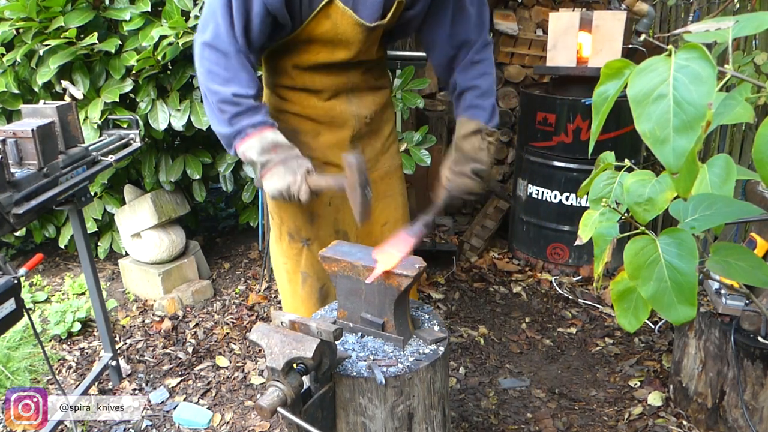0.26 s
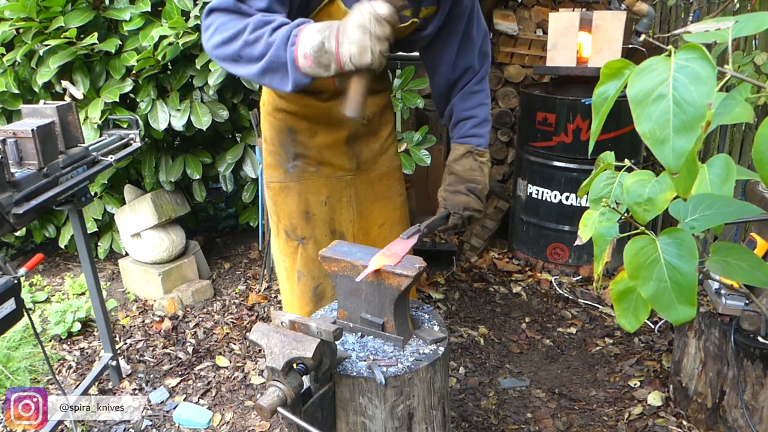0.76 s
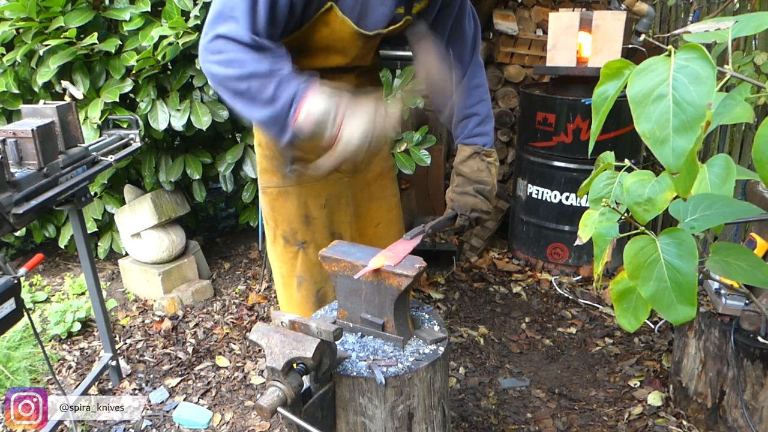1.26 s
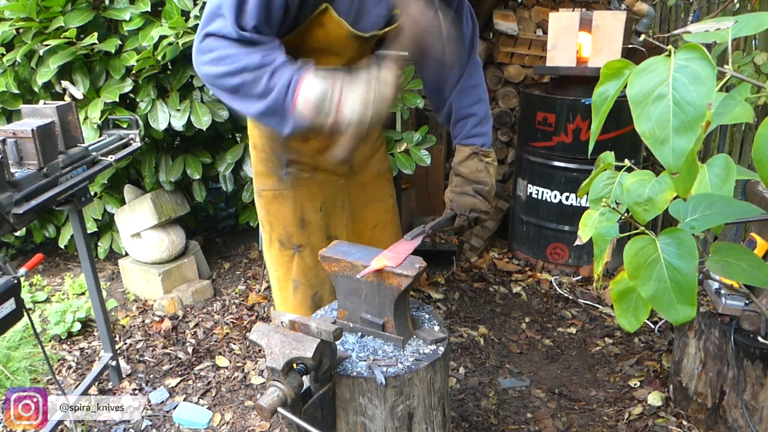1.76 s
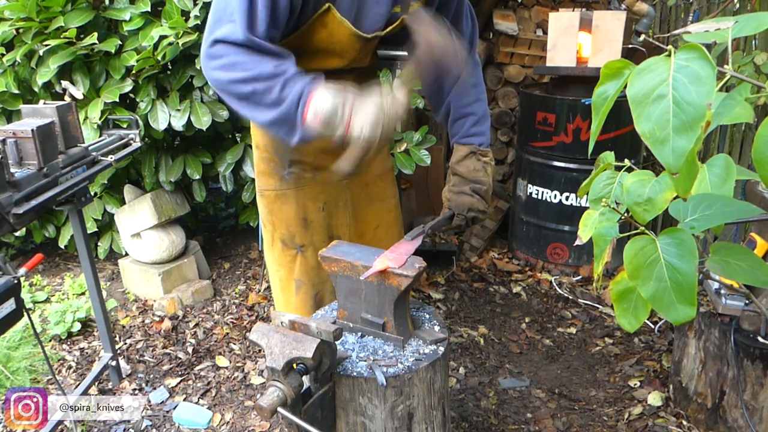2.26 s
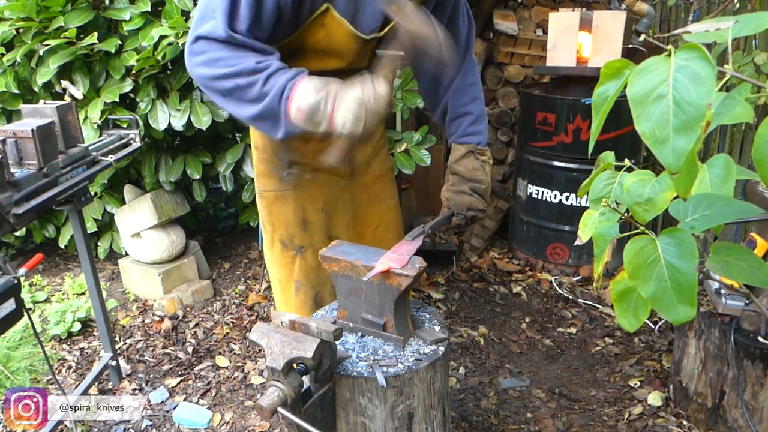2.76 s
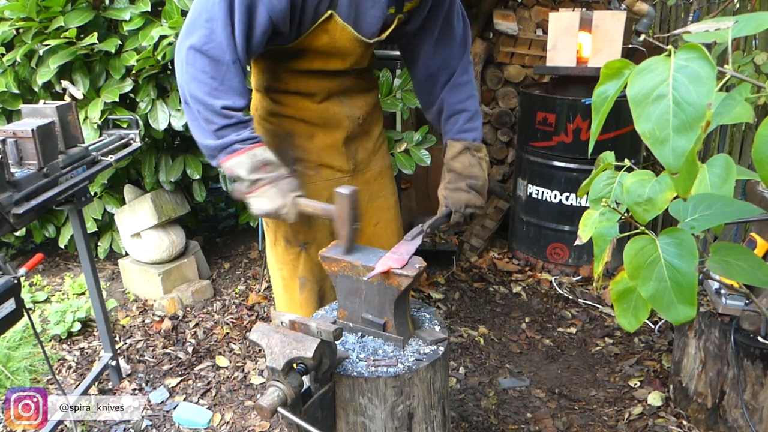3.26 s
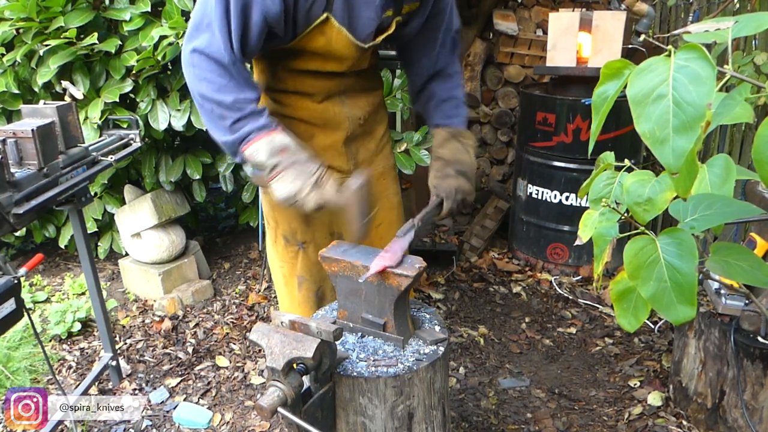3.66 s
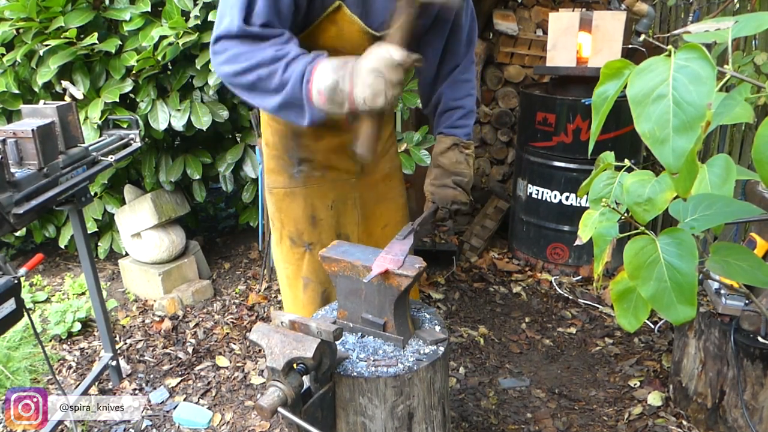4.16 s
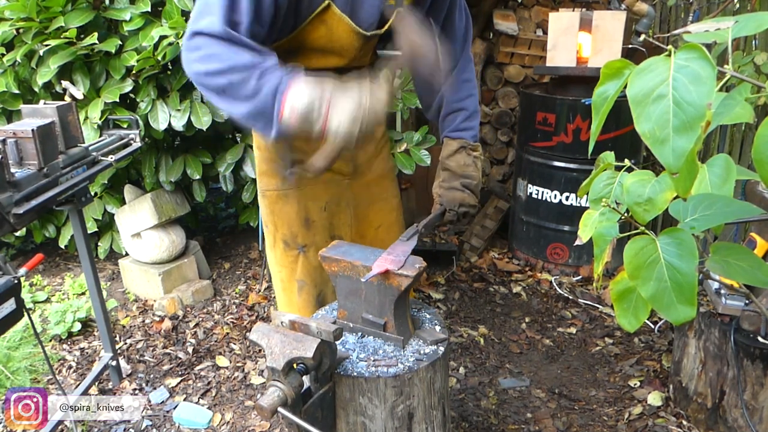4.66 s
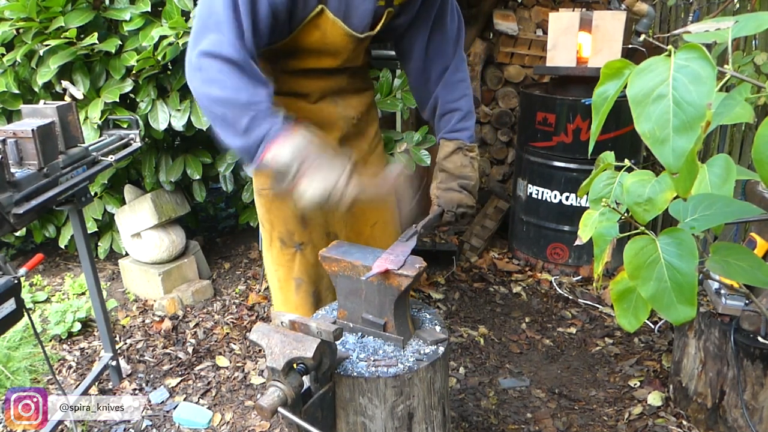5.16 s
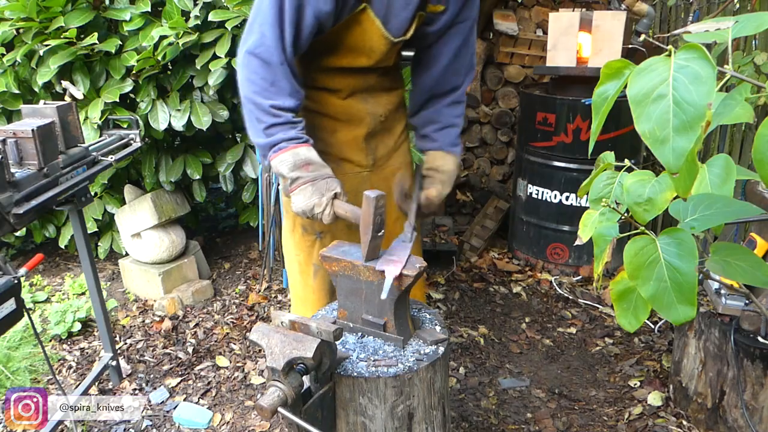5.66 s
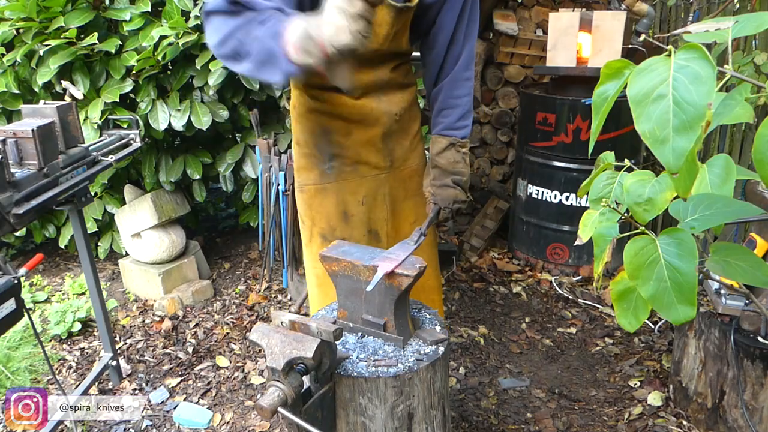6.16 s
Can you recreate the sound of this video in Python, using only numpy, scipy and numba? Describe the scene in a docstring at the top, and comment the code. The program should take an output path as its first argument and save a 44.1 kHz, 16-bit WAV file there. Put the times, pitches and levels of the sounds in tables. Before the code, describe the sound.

Rapid, hard metallic hammer blows with short high rings, over a low gas-burner roar that swells whenever the hammering pauses.

```python
"""A hammer strikes a hot blade on a small anvil in a garden, in front of a gas forge that roars.
Each blow clacks through damped modes, is heard twice about 12 ms apart, and leaves a few high steel modes ringing.
The roar and hiss are coloured noises with wavering levels; soft metallic puffs and a double tink fill in.
The camera's gain control ducks on sharp peaks, so the roar swells in the pauses."""
import sys
import numpy as np
from scipy.fft import rfft, irfft, next_fast_len
from scipy.io import wavfile
from scipy.ndimage import uniform_filter1d, map_coordinates
from numba import njit

SR = 44100
rng = np.random.default_rng(int(sys.argv[2]) if len(sys.argv) > 2 else 0)


def master(y):
    """Save y as 16-bit WAV."""
    cut = np.clip(np.atleast_2d(y).T, -1, 1)
    pcm = np.round(cut * 32767)  # scale
    wavfile.write(sys.argv[1], SR, pcm.astype(np.int16))


N = 282681
LEAD = SR // 5  # samples of room for a blow placed just before the start
DOUBLE_S = 0.0121  # each blow or tink is heard twice, this far apart


def amp(db):
    """Decibels to an amplitude factor."""
    return 10 ** (np.asarray(db) / 20)


def unit(x):
    """Scale to rms 1."""
    return x / np.sqrt(np.mean(x ** 2) + 1e-20)


def along(points, hz):
    """Read a curve of (pitch_hz, value) points on a log frequency axis."""
    f, v = np.transpose(points)
    return np.interp(np.log(hz + 1), np.log(f + 1), v)


def wobble(rate, size=N):
    """A smooth random curve with rate knots a second."""
    knots = rng.standard_normal(int(size * rate / SR) + 4)
    return map_coordinates(knots, [np.arange(size) * rate / SR])


def filtered(x, response):
    """Shape x by a complex response of frequency."""
    n = x.shape[-1]
    m = next_fast_len(n + SR // 4)
    return irfft(rfft(x, m) * response(np.fft.rfftfreq(m, 1 / SR)), m)[..., :n]


def sides(balance, hz):
    """Left and right gains for a left-minus-right balance curve in dB."""
    return amp(np.outer([.5, -.5], along(balance, hz)))


def pair(spectrum, alike, size=N):
    """Left and right noises of one colour, rms 1, partly alike through a shared middle."""
    def middle_and_side(hz):
        angle = np.arccos(np.clip(along(alike, hz), -1, 1)) / 2
        return amp(along(spectrum, hz)) * [np.cos(angle), np.sin(angle)]

    mid, side = filtered(rng.standard_normal((2, size)), middle_and_side)
    return unit(np.array([mid + side, mid - side]))


def resonance(hz, centre, width):
    """Complex response of one damped mode, 1 at its centre."""
    return 1j * hz * width / (centre * centre - hz * hz + 1j * hz * width)


def ringing(hz, db, t60, rise, t):
    """A steel mode: a sine with a soft start and an exponential decay."""
    t = np.clip(t, 0, None)
    soft_start = 1 - np.exp(-(t / rise) ** 2)
    return soft_start * amp(db - 60 * t / t60) * np.sin(2 * np.pi * (hz * t + rng.random()))


def empty_track():
    """A silent stereo track with room before the start and after the end."""
    return np.zeros((2, LEAD + N + SR))


def place(track, start_s, sound):
    """Add a sound to the track at its start time."""
    start = LEAD + round(start_s * SR)
    track[:, start:start + sound.shape[-1]] += sound


# anvil heard left against right: pitch_hz, left_minus_right_db
ANVIL_SIDE = [(300, -5.5), (1300, -5.5), (1700, -6.5), (3000, -3.5), (8000, 0), (15000, 3.5)]


def anvil_at_microphone(track):
    """Stereo placing, and no deep bass from so small an anvil."""
    return filtered(track, lambda hz: sides(ANVIL_SIDE, hz) * (1j * hz / (60 + 1j * hz)) ** 2)


# damped modes of blade and anvil, before each clack's offsets: pitch_hz, width_hz, level_db
# rows: thud, main, two of the upper body, then treble
BODY_MODES = [(985, 250, 2), (1624, 234, 11), (3186, 380, 5.5), (3996, 1200, -9.5), (4970, 1050, -10.5),
              (6480, 270, -13.5), (8410, 100, -5.5), (10250, 200, 0), (13600, 280, -1)]
# the log under the anvil, before the thud offset: pitch_hz, width_hz, level_db
STUMP = (360, 266, 6.3)
# near echoes within each knock: delay_s, level_db
GROUND_ECHOES = [(.0011, -19.5), (.0026, -38), (.0052, -21)]


def knock(upper_db, treble_db, thud_db, t):
    """A push and a noisy crunch excite the damped modes and the log, with near echoes."""
    push = 0.22 * amp(-60 * t / 0.017) * rng.standard_normal(len(t))
    push[:4] += np.hanning(6)[1:5]
    extra_db = [thud_db + 8.5, 0, upper_db + 5.0, upper_db + 0.5]
    extra_db += [treble_db + 2.5] * (len(BODY_MODES) - 4)
    log_hz, log_width, log_db = STUMP

    def response(hz):
        body = sum((-1) ** k * amp(db + extra_db[k]) * resonance(hz, centre, width)
                   for k, (centre, width, db) in enumerate(BODY_MODES))
        log = amp(log_db + thud_db) * resonance(hz, log_hz, log_width)
        echoes = 1 + sum(amp(db) * np.exp(-2j * np.pi * hz * s) for s, db in GROUND_ECHOES)
        return (body - log) * echoes

    sound = filtered(push, response)
    return sound / np.sqrt(np.mean(sound[:SR // 400] ** 2))  # first 2.5 ms at rms 1


# faint partials of a clack, in matching rows: pitch_hz
FAINT_HZ = [4775, 5850, 6280, 9426, 10910]
# level_db (re clack, before treble offset and random change), t60_s
FAINT = [(-35, 0.11), (-30, 0.078), (-31, 0.086), (-21, 0.079), (-23, 0.07)]
# colour of the first crack: pitch_hz, level_db_per_hz
CRACK = [(2500, -2), (4500, 0), (8000, -7.5), (12000, -15), (16000, -25)]
# colour of the scatter after the knock: pitch_hz, level_db_per_hz
SPLASH = [(410, -17), (700, -0.5), (5290, -7), (8510, -8), (8860, -2.5), (9590, -12), (10900, -8.5),
          (15200, -13.5), (16500, -54)]


def clack(scatter_db, upper_db=0, treble_db=0, thud_db=0):
    """One clack of level about 1: knock, first crack of noise, faint partials and scatter."""
    t = np.arange(SR // 5) / SR
    body = knock(upper_db, treble_db, thud_db, t)
    partials = sum(ringing(hz, db + treble_db + rng.normal(0, 6.8), t60, 0.0027, t)
                   for hz, (db, t60) in zip(FAINT_HZ, FAINT))
    crack_level = amp(-4.5 + treble_db - 60 * t / 0.013) * (1 - np.exp(-t / 0.00012))
    crack = crack_level * pair(CRACK, [(6000, 1.0)], size=len(t))
    # scatter fades in a quick and a slow stage
    fade = (amp(-60 * t / 0.021) + amp(-4.5 - 60 * t / 0.13)) * (1 - np.exp(-t / 0.0013))
    scatter = fade * pair(SPLASH, [(1000, 0.61), (6000, 0.78), (13000, 0.45)], size=len(t))
    return body + crack + partials + amp(scatter_db + 0.42 * treble_db) * scatter


# long-ringing steel modes, in matching rows: pitch_hz
RING_HZ = [8403, 9372, 10180, 10330, 7333, 7718]
# waits (1 = sounds only once the hammer has lifted)
RING_WAITS = [0, 1, 1, 0, 0, 0]
# group (which ring level of a blow the mode takes)
RING_GROUP = [0, 1, 2, 2, 3, 3]
# t60_s, rise_s, left_minus_right_db, level_db (re its group)
RING = [(0.48, 0.013, 2.5, 0), (0.17, 0.015, 3.6, 0), (0.11, 0.0013, 5.5, -1), (0.041, 0.0015, 0, 2.5),
        (0.12, 0.004, 8, 8), (0.12, 0.006, 9, 6)]
LIFT_S = 0.0054  # the hammer lifts this long after the louder sounding


def steel_ring(group_db, until_next_s):
    """High steel modes waver and decay, and fade out just before the next strong blow."""
    t = np.arange(SR) / SR
    fade_out = np.clip((until_next_s - 0.004 - t) / 0.0062, 0, 1) ** 2  # silent 4 ms before it
    ring = np.zeros((2, SR))
    for hz, waits, group, (t60, rise, pan_db, own_db) in zip(RING_HZ, RING_WAITS, RING_GROUP, RING):
        waver = amp(2.93 * wobble(28.0, size=SR))
        mode = ringing(hz, group_db[group] + own_db, t60, rise, t - waits * LIFT_S)
        ring += np.outer(amp([pan_db / 2, -pan_db / 2]), fade_out * waver * mode)
    return ring


# blows, and the clack under the double tink at 5.95 s, each heard twice:
# start_s (first sounding), first_level_db, second_level_db, treble_db, thud_db (offsets),
# then ring level_db of four groups: 8.4 kHz, 9.4 kHz, pair at 10 kHz, pair at 7.5 kHz
BLOWS = [(-0.08, -4.5, -28, -2, -5, -47, -20, -39, -48),
         (0.0828, -35.5, -17.5, -5, -13, -45.5, -31, -43, -55),
         (0.237, -26, -23, -2, -23, -36, -35, -25, -62), (0.9115, -26.5, -51, 9, -6, -36, -29, -49, -52),
         (1.0834, -28, -22, -1, -1, -32.5, -46, -29, -59),
         (1.2531, -18.5, -38.5, -2, -6, -35, -28, -47, -54),
         (1.404, -28.5, -19.5, 3, -5, -35, -16, -28, -56),
         (1.5711, -20, -32.5, 4.5, -4, -48, -25, -37, -51), (1.728, -26, -21, 4.5, -2, -42, -15, -32, -50),
         (1.8954, -37.5, -18.5, 1, -1.5, -32, -18, -38, -44),
         (2.0667, -18.5, -26, -2.5, -6, -38.5, -16, -32, -53),
         (2.2349, -19, -33, 3, -1.5, -37, -15, -41, -53), (2.3983, -20.5, -28, 4, -0.5, -43, -18, -44, -52),
         (2.5627, -21, -25, 1, -3, -41, -16, -37, -55),
         (2.7291, -20.5, -27.5, 4.5, 0.5, -42, -10, -42, -55),
         (2.894, -19, -24, -1.5, -0.5, -48, -19.5, -32, -43),
         (3.0586, -31, -19, 1.5, -5, -44, -21.5, -38, -50),
         (3.234, -30, -19, -1, 1.5, -45, -21.5, -44, -53),
         (3.9116, -42.5, -22.5, 3.5, 2, -56, -36, -49, -46), (4.1114, -20, -29, -2, -1, -33, -29, -48, -39),
         (4.2896, -19, -36, 4, 1.5, -28.5, -14, -42, -36),
         (4.4577, -21, -24, 4.5, -1.5, -34, -21.5, -46, -40),
         (4.6353, -18.5, -27.5, -2, 0, -37.5, -31, -29.5, -42),
         (4.8063, -35.5, -18.5, 1.5, -2.5, -33.5, -44, -45, -46),
         (4.9908, -21.5, -21.5, 0.5, -2.5, -34.5, -25, -31, -52),
         (5.163, -41, -18.5, -1.5, -9, -35.5, -23.5, -35, -55),
         (5.374, -18.5, -30.5, 1.5, -6, -37.5, -21.5, -34, -49),
         (5.4957, -50, -35, -32, -12, -52, -55, -57, -70),
         (5.9549, -36.5, -32.5, -5.5, 4.5, -54, -59, -44, -56),
         (6.3102, -26, -34.5, 10, 0, -26, -27, -44, -45)]
STRONG_DB = -33  # a blow whose louder sounding is no stronger than this leaves earlier rings sounding
UPPER_DB, UPPER_SCATTER_DB = -1.5, 1.2  # upper body offset, and its random change from row to row
UPPER_FOLLOWS = 0.18  # share of the treble offset that the upper body follows


def hammer():
    """Each clack is heard twice; the steel ring starts with its louder sounding."""
    clacks, rings = empty_track(), empty_track()
    louder_s = [s + DOUBLE_S * (second_db > first_db) for s, first_db, second_db, *_ in BLOWS]
    strong_s = [s for s, row in zip(louder_s, BLOWS) if max(row[1:3]) > STRONG_DB]
    strong_s.append(N / SR + 1)
    for row, ring_s in zip(BLOWS, louder_s):
        first_s, first_db, second_db, treble_db, thud_db, *group_db = row
        upper_db = rng.normal(UPPER_DB + UPPER_FOLLOWS * treble_db, UPPER_SCATTER_DB)
        hit = clack(-5.5, upper_db, treble_db, thud_db)
        place(clacks, first_s, amp(first_db) * hit)
        place(clacks, first_s + DOUBLE_S, amp(second_db) * hit)
        next_s = min(s for s in strong_s if s > ring_s)
        place(rings, ring_s, steel_ring(group_db, next_s - ring_s))
    return anvil_at_microphone(clacks) + rings


# burner strength: start_s, flame_db, jet_db
FLAME = [(0, 0.5, -0.5), (.4, -3, -2.5), (.8, -0.5, -0.5), (1.3, 1.5, 1), (2.1, 0, 1.5), (3, -1.5, -1),
         (3.5, -0.5, -1), (4.2, 1.5, 4.5), (4.9, -1, -0.5), (5.6, 0.55, 1), (6.2, 1.5, 2), (6.41, 1, 6.5)]
# flame in the chamber: pitch_hz, level_db_per_hz
ROAR = [(15, -88), (25, -63), (104, -21), (141, -22), (209, -11.5), (248, -10.5), (338, 0.5), (388, -8.5),
        (468, -7.5), (555, -21), (659, -15), (782, -28.5), (928, -27.5), (1120, -30.5), (1500, -49.5),
        (1950, -94), (3300, -120)]
# gas jet: pitch_hz, level_db_per_hz
HISS = [(760, -4), (1300, -2), (1540, -7), (1890, -2.5), (2430, -6), (3420, -8), (3840, -7.5), (4650, -11),
        (6400, -11), (7510, -19), (8710, -15), (10600, -16.5), (12600, -19), (15600, -23), (16500, -36)]
# likeness of the two channels: pitch_hz, likeness (1 = identical)
ALIKE = [(40, 0.25), (130, 0.79), (300, 0.96), (550, 0.92), (1200, 0.88), (3000, .8), (8000, 0.84),
         (15000, .6)]
# burner resonances: pitch_hz, width_hz, lift_db
PIPE = [(1080, 80, 3), (1220, 80, 3), (1870, 130, 6), (3870, 260, 4), (12500, 1100, 4)]
# forge heard left against right: pitch_hz, left_minus_right_db
FORGE_SIDE = [(60, 1), (110, 3), (200, -1.5), (380, -3.5), (700, -6.5), (1290, -8.5), (2380, -6.5),
              (4400, -2.5), (8120, -0.5), (15000, 2.5)]
# phase between the channels: pitch_hz, left_lead_rad
FORGE_LEAD = [(130, -1.44), (350, -0.81), (700, -0.68), (1100, -0.47), (3000, -0.26), (12000, 0.51)]


def forge():
    """Turbulent flame booms in the chamber's resonances over the hiss of the jet."""
    knot_s, *levels = np.transpose(FLAME)
    flame_db, jet_db = [np.interp(np.arange(N) / SR, knot_s, v) for v in levels]
    roar_db = -34.5 + flame_db + 0.63 * wobble(9) + 1.29 * wobble(45)
    hiss_db = -59.5 + jet_db + 0.84 * wobble(6.2) + 1.1 * wobble(55)
    roar = amp(roar_db) * pair(ROAR, ALIKE)
    hiss = amp(hiss_db) * pair(HISS, ALIKE)

    def response(hz):
        lift = amp(sum(db / (1 + (2 * (hz - c) / w) ** 2) for c, w, db in PIPE))
        lead = np.exp(1j * np.outer([.5, -.5], along(FORGE_LEAD, hz)))
        return lift * sides(FORGE_SIDE, hz) * lead

    return filtered(roar + hiss, response)


# colour of a puff, before its treble offset: pitch_hz, level_db_per_hz
PUFF_COLOUR = [(700, -22), (1800, -5), (3500, 2.5), (7000, -4.5), (10500, -4), (15000, -20)]


def puff(treble_db):
    """A soft, short metallic puff: coloured noise with a gentle onset."""
    t = np.arange(SR // 20) / SR
    colour = [(hz, db + treble_db * (hz > 2500)) for hz, db in PUFF_COLOUR]
    envelope = (1 - np.exp(-t / 0.0025)) * amp(-60 * t / 0.039)
    return envelope * pair(colour, [(3000, 0.86)], size=len(t))


# soft metallic puffs, some of them faint lead-ins just before a blow:
# start_s, level_db, treble_db (offset)
PUFFS = [(0.459, -38, -1), (0.47, -40.5, -6), (0.901, -38.5, 4), (1.24, -32.5, -7), (3.3, -45, -25),
         (3.312, -37.5, -27), (3.331, -46, -25), (5.505, -39, -21), (5.667, -46, -5), (5.772, -45, 0)]


def metallic_puffs():
    """Soft short puffs of noise, placed left to right like the anvil."""
    track = empty_track()
    for start_s, db, treble_db in PUFFS:
        place(track, start_s, amp(db) * puff(treble_db))
    return anvil_at_microphone(track)


# blade knocked against the tongs: pitch_hz, level_db, t60_s
TINK = [(1057, -29.5, 0.05), (2297, -28.5, 0.035), (2376, -31, 0.072), (2950, -41, 0.049),
        (3520, -29, 0.015), (4000, -34, 0.028), (4830, -45, 0.069)]
TINK_S = 5.953


def tongs_tink():
    """The blade knocks against the tongs: short steel modes, heard twice."""
    track = empty_track()
    t = np.arange(SR) / SR
    for start_s in (TINK_S, TINK_S + DOUBLE_S):
        place(track, start_s, sum(ringing(hz, db, t60, 0.0013, t) for hz, db, t60 in TINK))
    return anvil_at_microphone(track)


def scene():
    """Hammer, puffs and tink in front, forge behind."""
    front = hammer() + metallic_puffs() + tongs_tink()
    return front[:, LEAD:LEAD + N] + forge()


@njit
def held(excess, fall):
    """Peak follower: jumps up at once, sinks exponentially."""
    out, level = np.empty_like(excess), excess[0]
    for i in range(len(excess)):
        level = max(excess[i], level * fall)
        out[i] = level
    return out


TOP_HZ = 16600  # band limit


def record(dry):
    """Gain control ducks late and lets go in a quick and a slow stage; then peak rounding and treble limit."""
    edge = filtered(dry.mean(0), lambda hz: hz / (hz + 1500) * (hz > 900))  # it listens to the treble
    loud_db = 10 * np.log10(np.abs(uniform_filter1d(edge ** 2, SR // 500)) + 1e-12)
    excess = np.clip((loud_db + 39) / 16, 0, 1)
    excess[0] = 0.82  # already ducked by earlier blows
    quick_db = 7 * held(excess, np.exp(-1 / (0.029 * SR)))
    slow_db = 9 * held(excess, np.exp(-1 / (0.4 * SR)))
    span = round(0.028 * SR)
    # averaging over the past 28 ms makes the duck late
    late_db = uniform_filter1d(quick_db + slow_db, span, origin=(span - 1) // 2)
    ducked = dry * amp(-late_db)
    rounded = ducked / (1 + np.abs(ducked / 0.2) ** 3) ** (1 / 3)  # the sharpest peaks are rounded off
    return filtered(rounded, lambda hz: (hz < TOP_HZ) / np.sqrt(1 + (hz / 16000) ** 14))


dry = scene()
out = record(dry)
master(out)
```